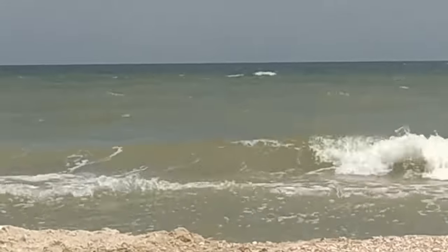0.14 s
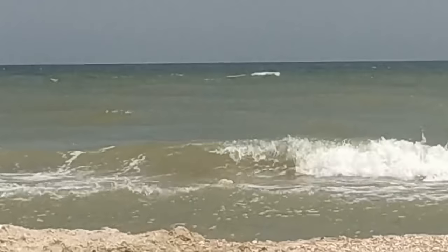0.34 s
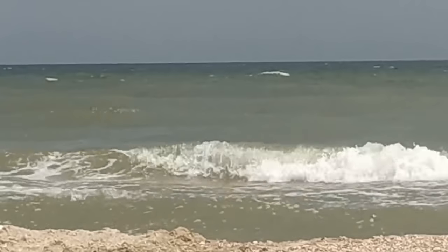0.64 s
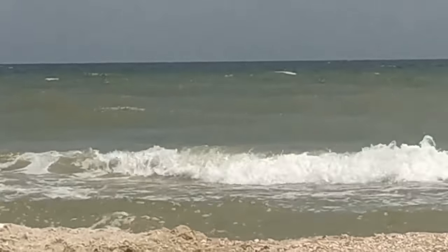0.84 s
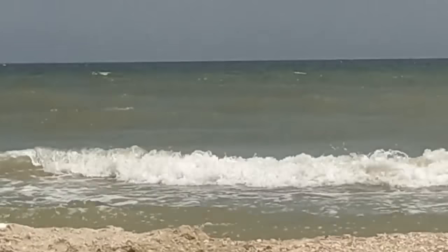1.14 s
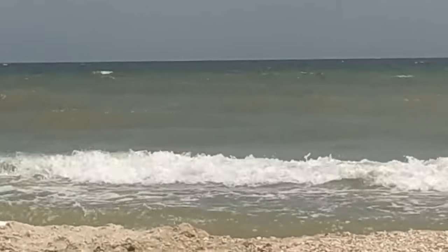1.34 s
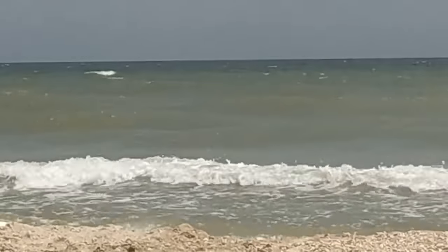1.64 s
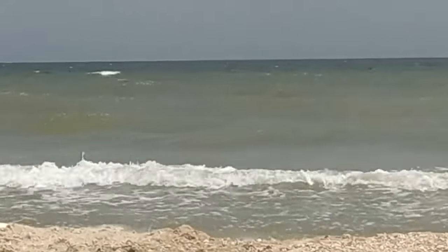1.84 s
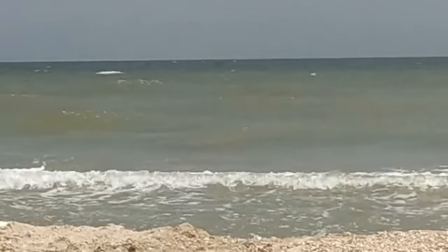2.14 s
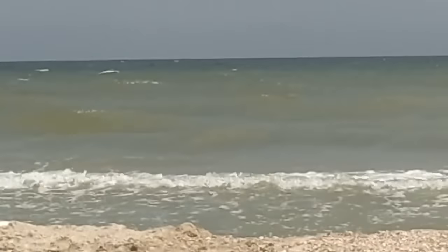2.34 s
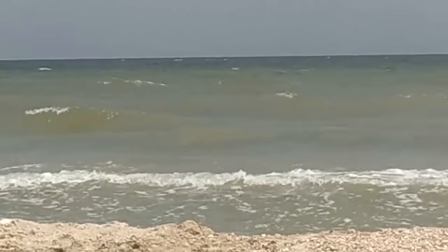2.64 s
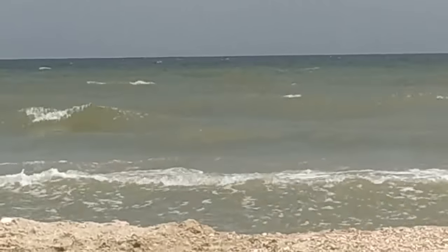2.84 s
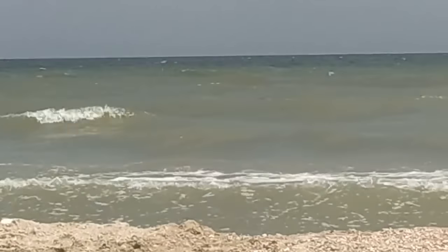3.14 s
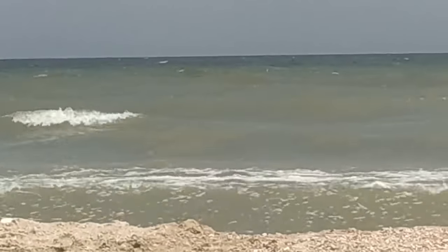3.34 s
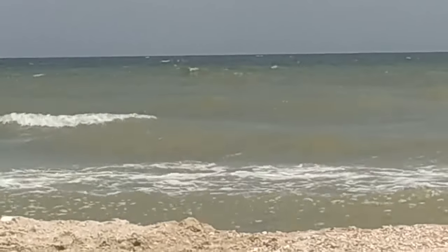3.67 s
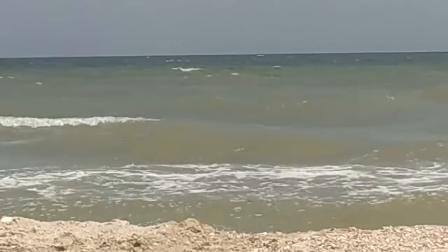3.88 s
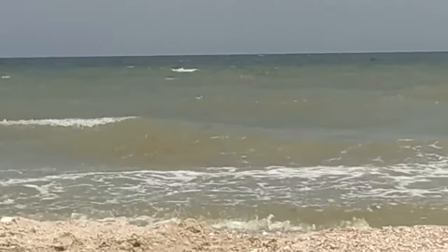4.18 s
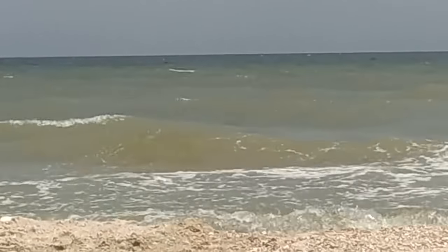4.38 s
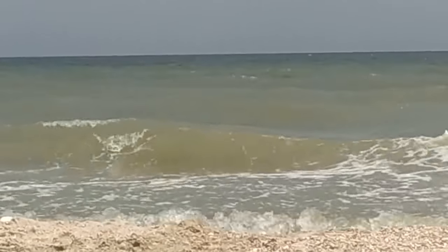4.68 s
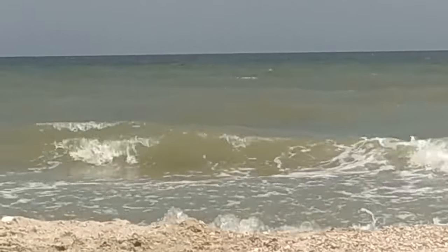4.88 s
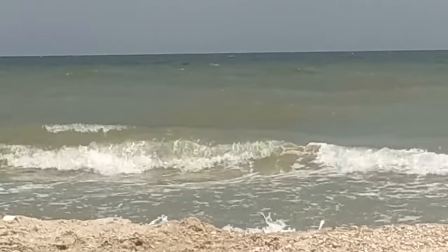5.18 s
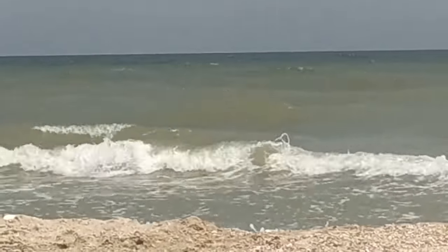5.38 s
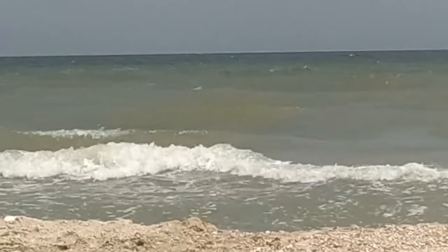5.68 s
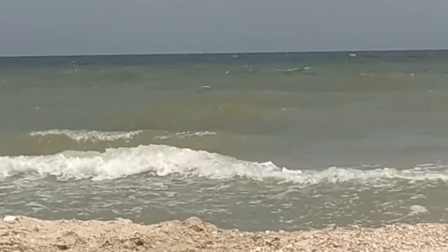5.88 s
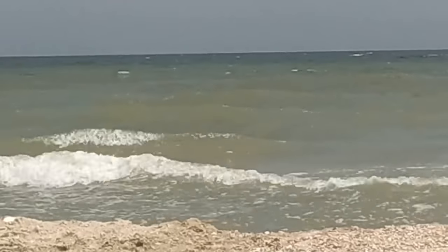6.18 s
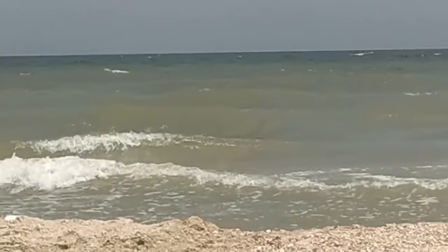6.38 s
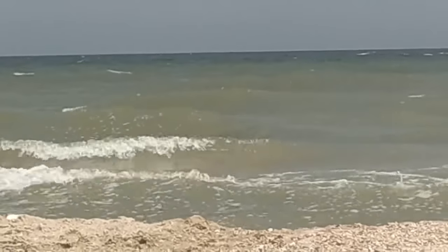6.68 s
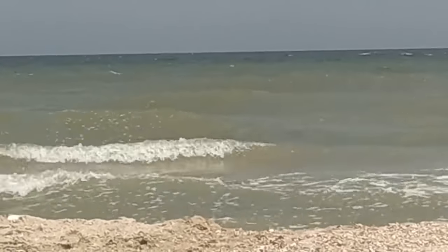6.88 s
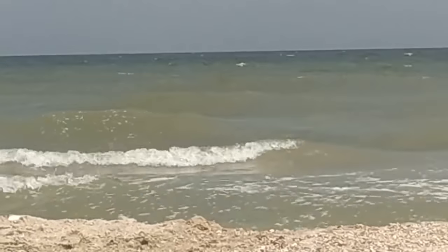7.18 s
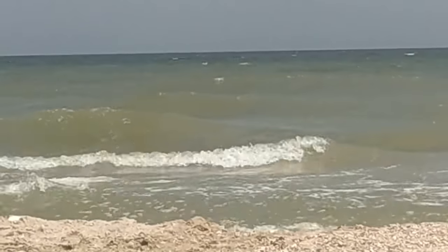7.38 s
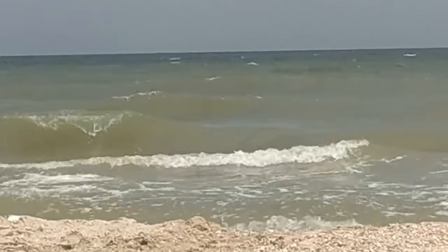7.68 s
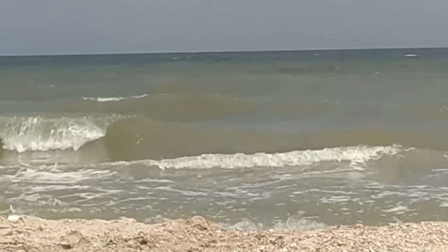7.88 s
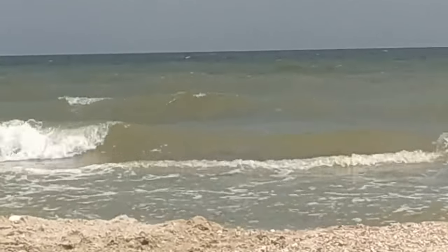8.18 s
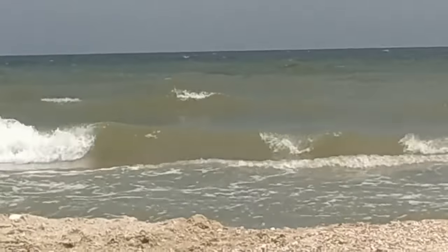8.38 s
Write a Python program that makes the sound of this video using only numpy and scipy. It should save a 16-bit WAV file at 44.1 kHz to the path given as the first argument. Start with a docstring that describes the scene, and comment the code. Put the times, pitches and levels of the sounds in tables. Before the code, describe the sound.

A steady, bright surf hiss fills the whole stretch from 0 s: a soft midrange wash, splashy grain, crisp high foam fizz and fine spray, wide in stereo with the fizz leaning left. Very low wind rumble and faint flutter move irregularly between the sides. Around 2.1 s a sharp droplet pop clicks close on the left, with fainter ticks near 2.8 and 3.6 s. The surf eases around 2.9 and 4 s, then swells fuller near 4.8-5.3 s as waves break. Wind thumps become more frequent from 5 s; the strongest gust hits at about 6.7-6.8 s, mostly left, with momentary flickering dips in the hiss, and another tiny tick at 6.9 s. Buffeting continues through 7-8 s. From 7.5 s the foam brightens, fizzing loudest in the final second and still going at the end. Outdoors, phone microphone, without echo.

```python
"""Small waves break and run up a shell beach in a fresh breeze, heard through the two ports of a phone.
From the start, shaped noise makes four layers of surf (wash, splash, fizz, spray) and the wind's rumble and flutter.
Brief tone bursts make drops of spray pop close by, first near 2.1 s; short bursts of low noise buffet one port.
Near 6.7 s the strongest gust strikes and the surf dips briefly at the left port; in the last second the foam
fizzes loudest."""
import sys
import numpy as np
from scipy import signal
from scipy.fft import rfft, irfft
from scipy.io import wavfile
from scipy.ndimage import uniform_filter1d

SR = 44100
rng = np.random.default_rng(int(sys.argv[2]) if len(sys.argv) > 2 else 0)


def persist_wave(psi):
    """Save psi, clipped to +-1, as 16-bit WAV."""
    counts = np.round(np.clip(psi, -1, 1) * 32767).astype(np.int16)
    wavfile.write(sys.argv[1], SR, np.atleast_2d(counts).T)


N = 375732


def gain_of(db):
    """Level to amplitude: 20 dB is a factor of ten."""
    return 10 ** (np.asarray(db) / 20)


def evened(x):
    """Normalization to unit rms."""
    return x / np.sqrt(np.mean(x ** 2) + 1e-20)


def read(points, hz):
    """Interpolation of a spectral curve along logarithmic frequency."""
    f, value = np.transpose(points)
    return np.interp(np.log(hz + 1), np.log(f + 1), value)


def follow(points, t):
    """Linear interpolation of a curve along time."""
    return np.interp(t, *np.transpose(points))


def filtered(x, shape):
    """Linear filtering: multiplying the spectrum by a gain curve colours both channels."""
    return irfft(rfft(x) * gain_of(read(shape, np.fft.rfftfreq(N, 1 / SR))), N)


def coloured(shape, steady_s):
    """Filtered noise, incoherent between the ports, its rms held near 1 over steady_s."""
    x = filtered(rng.standard_normal((2, N)), shape)
    width = round(steady_s * SR)
    power = uniform_filter1d(uniform_filter1d(x ** 2, size=width), size=width)
    return x / np.sqrt(abs(power) + 1e-20)


def wander(shape, frames, bins):
    """Moving averages correlate a random field over some frames and bins; its rms is 1."""
    field = uniform_filter1d(rng.standard_normal(shape), size=frames, axis=-1)
    return evened(uniform_filter1d(field, size=bins, axis=-2))


def slow_wander(t, frames):
    """A smoothed random curve for each port, with steps of 256 samples, interpolated to the samples."""
    frame_s = np.arange(N // 256 + 2) * 256 / SR
    curves = wander((2, 1, len(frame_s)), frames, bins=1)[:, 0]
    return np.array([np.interp(t, frame_s, curve) for curve in curves])


def buffets(t):
    """Amplitude modulation: Gaussian envelopes let bursts of low and higher noise through at one port."""
    # Gusts that buffet one port. Each row: centre in seconds, port (0 left, 1 right), rms level at the
    # centre in dB, length in seconds, share of the power that reaches higher (0-1).
    gust_rows = [(0.435, 1, -45, 0.038, 0.3), (0.489, 0, -45, 0.04, 0.0), (0.696, 0, -42, 0.048, 0.0),
                 (0.81, 1, -43, 0.06, 0.5), (1.246, 0, -44, 0.023, 0.0), (1.512, 1, -44.5, 0.049, 0.2),
                 (1.76, 0, -43, 0.16, 0.04), (2.215, 1, -42, 0.03, 0.19), (2.22, 0, -35, 0.03, 0.4),
                 (2.445, 0, -35, 0.053, 0), (2.928, 0, -49, 0.046, 0.0), (3.074, 1, -43, 0.029, 0.0),
                 (3.126, 0, -43, 0.055, 0.1), (3.312, 1, -61, 0.09, 0.1), (3.607, 0, -32, 0.044, 0.04),
                 (4.29, 0, -42.9, 0.05, 0), (4.67, 1, -41.4, 0.069, 0.3), (4.86, 1, -44, 0.039, 0.0),
                 (4.867, 0, -35, 0.099, 0.1), (4.99, 1, -42, 0.029, 0.27), (5.293, 0, -37, 0.072, 0.6),
                 (5.443, 0, -40, 0.03, 0.26), (5.512, 1, -49, 0.054, 0), (5.565, 0, -45, 0.1, 0),
                 (5.777, 1, -47, 0.035, 0.0), (5.81, 0, -41.5, 0.062, 0.0), (6.103, 0, -38.5, 0.068, 0.0),
                 (6.26, 0, -35, 0.019, 0.3), (6.354, 1, -36, 0.03, 0.14), (6.377, 0, -44, 0.09, 0.07),
                 (6.624, 0, -34, 0.1, 0.27), (6.687, 0, -29, 0.018, 0.7), (6.725, 0, -43, 0.028, 0.6),
                 (6.756, 0, -27.5, 0.023, 0.8), (6.786, 0, -27.5, 0.024, 0.8), (6.74, 0, -47.5, 0.21, 0.5),
                 (6.77, 1, -35, 0.057, 0.4), (6.845, 0, -33, 0.056, 0.3), (6.899, 1, -40, 0.034, 0),
                 (6.954, 0, -30.5, 0.038, 0.5), (6.997, 0, -42, 0.036, 0.4), (7.03, 0, -44, 0.17, 0.16),
                 (7.07, 0, -41, 0.04, 0.04), (7.021, 1, -37, 0.04, 0), (7.093, 1, -34, 0.068, 0),
                 (7.118, 0, -29.5, 0.036, 0.3), (7.298, 0, -33.5, 0.036, 0.6), (7.36, 1, -45, 0.053, 0.0),
                 (7.458, 0, -31, 0.037, 0), (7.57, 1, -38, 0.058, 0.1), (7.636, 0, -35, 0.059, 0.08),
                 (7.807, 1, -38, 0.055, 0.2), (7.907, 0, -35.5, 0.036, 0.0), (7.946, 1, -37, 0.07, 0.1),
                 (8.002, 0, -34, 0.03, 0.6), (8.067, 0, -32.5, 0.092, 0.54), (8.224, 0, -37, 0.044, 0.2),
                 (8.225, 1, -40, 0.038, 0.2), (8.354, 0, -38, 0.033, 0.01), (8.442, 0, -41, 0.034, 0.1)]
    # Spectra of the thud, strongest at 70 and 180 Hz, and of its higher part.
    # Each row: frequency in Hz, relative level in dB.
    low_shape = [(30, -0.5), (70, 4), (125, -5.5), (180, 4), (250, -14), (330, -9.5), (500, -20),
                 (1200, -62)]
    upper_shape = [(250, -15.5), (330, -6.5), (450, -13.5), (600, -11), (900, -17), (1500, -33.5)]
    low, upper = np.zeros((2, 2, N))
    for s, port, db, length, reach in gust_rows:
        near = slice(max(round((s - .25) * SR), 0), round((s + .25) * SR))
        gust = gain_of(db) * np.exp(-(2 * (t[near] - s) / length) ** 2)
        share = np.clip(reach, 0, 1)
        low[round(port), near] += np.sqrt(1 - share) * gust
        upper[round(port), near] += np.sqrt(share) * gust
    return low * coloured(low_shape, steady_s=.04) + upper * coloured(upper_shape, steady_s=.04)


def wind():
    """Incoherent pressure noise at the ports: slow swings, a flutter in puffs, and short buffets."""
    # Wind on the ports, before puffs and waver. Each row: time in seconds, rms level in dB of the
    # slow swings at the left, at the right, of the flutter at the left, at the right.
    breeze = [(0.0, -29, -40, -53, -60), (0.25, -37, -35, -59, -55.5), (0.5, -42, -28.5, -50, -51),
              (0.75, -27, -21, -49, -53), (1.0, -53, -27.5, -59, -53), (1.25, -24, -31, -48, -54),
              (1.5, -42, -26.5, -52, -54), (1.75, -22, -30.5, -46, -50), (2.0, -45, -28, -52, -54),
              (2.25, -22, -31.5, -45, -50), (2.5, -22, -28.5, -48, -57), (2.75, -46, -28, -52, -48),
              (3.0, -23, -45, -48, -47), (3.25, -26, -25, -63, -55), (3.5, -34, -19.5, -57, -53),
              (3.75, -32, -32, -47, -52), (4.0, -26, -30.5, -47.5, -58), (4.25, -57, -30, -59, -54),
              (4.5, -37, -36, -53, -49), (4.75, -29.5, -27.5, -54, -54), (5.0, -21, -24, -41.5, -58),
              (5.25, -17.5, -28, -61, -45), (5.5, -25.5, -22.5, -42, -47), (5.75, -26, -27.5, -48, -46.5),
              (6.0, -37, -26.5, -47, -56), (6.25, -31, -22, -51, -50), (6.5, -25, -26, -48, -49),
              (6.75, -18.5, -23, -44, -46), (7.0, -23, -24.5, -45, -46), (7.25, -17, -19, -46, -49),
              (7.5, -28, -33, -52, -55), (7.75, -34, -23.5, -41, -54), (8.0, -29.5, -23.5, -44, -50),
              (8.25, -31.5, -26, -42, -45), (8.52, -28, -32, -51, -49)]
    # Spectra of the swings and of the flutter. Each row: frequency in Hz, relative level in dB.
    swing_shape = [(1, 4), (5, -1), (10, 3.5), (20, -5.5), (32, -22.5), (45, -22.5), (62, -39), (120, -42),
                   (250, -75)]
    flutter_shape = [(30, 4.5), (70, -0.5), (125, -7.5), (180, -5.5), (250, -12.5), (500, -15), (1200, -62)]
    swing_waver_db, flutter_waver_db = 1.5, 2  # per unit of the random waver
    puffs_db, puff_most = 7, 1.4  # dB per unit of puff; puffs level off, lulls sink freely

    t = np.arange(N) / SR
    s, *columns = np.transpose(breeze)
    levels_db = np.array([np.interp(t, s, c) for c in columns])
    puffs = np.minimum(slow_wander(t, frames=10), puff_most)
    waver = slow_wander(t, frames=30)
    swing_db = levels_db[:2] + swing_waver_db * waver
    flutter_db = levels_db[2:] + puffs_db * puffs + flutter_waver_db * waver
    swings = gain_of(swing_db) * coloured(swing_shape, steady_s=.2)
    flutter = gain_of(flutter_db) * coloured(flutter_shape, steady_s=.04)
    return swings + flutter + buffets(t)


def pops(port_hz=((9800,), (8800,)), length_s=.0008):
    """Resonance: each pop rings both ports at their own frequency in a short symmetrical tone burst."""
    # Drops of spray that pop close by. Each row: time in seconds (the burst centres two length_s later),
    # peak level at the left port in dB, how much lower it is at the right in dB.
    drops = [(2.1045, -8, 8), (2.1074, 4, 8), (2.796, -7, 12), (3.5543, -5, 9), (6.8962, -6, 10)]
    out, t = np.zeros((2, N)), np.arange(-200, 200) / SR
    ring = np.exp(-(t / length_s) ** 4) * np.sin(2 * np.pi * np.array(port_hz) * t)
    for s, db, lean_db in drops:
        at = round((s + 2 * length_s) * SR) - 200
        out[:, at:at + len(t)] += gain_of([[db], [db - lean_db]]) * ring
    return out


def dips():
    """Amplitude modulation: the gain of the left port sinks for a few milliseconds."""
    # Dips in the strongest gust. Each row: centre in seconds, depth in dB, length in seconds.
    dip_rows = [(6.6985, -16, .004), (6.7619, -11, .0025), (6.7748, -12, .004)]
    t = np.arange(N) / SR
    left_db = sum(db * np.exp(-(2 * (t - s) / length) ** 4) for s, db, length in dip_rows)
    return gain_of([left_db, np.zeros(N)])


def layer_shares(hz):
    """Crossfaded bands: at every frequency the shares of the four layers add to one."""
    # Centres of wash, splash, fizz and spray in Hz.
    centres_hz = [1400, 4800, 9700, 13000]
    return np.array([read(list(zip(centres_hz, row)), hz) for row in np.eye(4)]).T


def swell(t, hz, shares):
    """Level modulation by band: each layer swells and leans; gives level and left-right difference in dB."""
    # The waves; only departures from each column's mean count. Each row: time in seconds, roar of the
    # breakers in dB, foam fizz in dB, fine spray in dB, lean to the left of foam in dB, of spray in dB.
    waves = [(0.0, -42.5, -19.5, -32.5, 10.5, 3), (0.5, -40.5, -19, -33, 14.5, 3),
             (0.95, -41, -18.5, -32.5, 9, 5), (1.3, -41, -19.5, -32.5, 12, 5),
             (1.8, -40, -20, -29.5, 10, 5), (2.15, -39.5, -18, -29.5, 8, 7),
             (2.5, -41.5, -20, -32, 12.5, 6), (2.9, -44, -22.5, -33, 12.5, 5),
             (3.3, -42.5, -19, -32.5, 10, 7), (3.7, -41.5, -18.5, -33.5, 10, 5),
             (4.0, -42, -21, -34, 11.5, 6), (4.35, -41, -17.5, -32.5, 11.5, 4),
             (4.75, -37.5, -18.5, -30.5, 12.5, 9), (5.3, -39, -16.5, -28.5, 7.5, 3),
             (5.55, -41.5, -19.5, -31, 10.5, 7), (6.0, -42.5, -19, -29, 8.5, 6),
             (6.5, -42.5, -18.5, -28.5, 9.5, 6), (6.9, -42, -18, -29.5, 9.5, 7),
             (7.1, -41, -17, -30, 12.5, 7.5), (7.5, -39.5, -16, -30, 13, 7.5),
             (7.8, -39, -15.5, -28.5, 9, 5), (8.1, -37.5, -14, -29, 10, 1.5),
             (8.52, -38.5, -12.5, -30, 10.5, 3)]
    # Shift of the mean level, then mean lean to the left, in dB for wash, splash, fizz and spray.
    layer_db = [0.06, -0.37, 0.5, -2.5]
    layer_lean_db = [1, -1.5, 0.83, -4]
    # Deep part of the wash; only departures from the mean count. Each row: time in seconds, level in dB.
    low_wash = [(0.0, -46.5), (0.73, -45), (2.16, -43.5), (2.82, -48.5), (4.03, -49), (4.7, -44.5),
                (5.13, -42), (5.91, -47.5), (6.86, -44.5), (7.21, -46), (7.9, -44), (8.52, -43)]
    # Where the deep part rules. Each row: frequency in Hz, share (0-1).
    low_wash_share = [(800, 1), (1400, 0)]
    # The band above the roar rises and sinks on its own. Each row: time in seconds, change in dB.
    low_splash = [(0.0, -1.5), (1.0, -1.5), (2.0, 0.5), (3.0, 2.5), (4.0, 0.5), (5.5, 2.5), (6.5, 0.5),
                  (7.5, -1), (8.52, 1)]
    # Extent of that band. Each row: frequency in Hz, share (0-1).
    low_splash_share = [(1900, 0), (2800, 1), (4200, 0)]
    splash_from_roar, splash_from_spray, wash_leans = 0.68, 0.69, 0.43  # dB per dB

    s, *columns = np.transpose(waves)
    roar, fizz, spray, lean, spray_lean = (np.interp(t, s, c - c.mean()) for c in columns)
    splash = splash_from_roar * roar + splash_from_spray * spray
    level_db = shares @ (np.c_[layer_db] + [roar, splash, fizz, spray])
    s, deep = np.transpose(low_wash)
    deep_change = np.interp(t, s, deep - deep.mean())
    level_db += read(low_wash_share, hz)[:, None] * (deep_change - roar)
    level_db += read(low_splash_share, hz)[:, None] * follow(low_splash, t)
    # The wash leans with the foam, the splash keeps its mean lean.
    lean_db = shares @ (np.c_[layer_lean_db] + [wash_leans * lean, 0 * lean, lean, spray_lean])
    return level_db, lean_db


def flicker(shares, frames):
    """Random level modulation: small drifting patches and quick flicker of wide bands, in dB."""
    # Depths in dB rms for wash, splash, fizz and spray: of the small patches, of the wide flicker
    # (a row for the left port, a row for the right), and of the flicker that both ports share.
    patchy_db = [1.27, 2.13, 0.35, 2.6]
    port_flicker_db = [
        [.2, .6, 0.99, 0.26],
        [.7, 1.1, 0.16, 0.71],
    ]
    common_db = [0.095, 0.16, 0.1, 0.36]
    patches = (shares @ patchy_db)[:, None] * wander((2, 257, frames), frames=10, bins=6)
    own = (port_flicker_db @ shares.T)[:, :, None] * wander((2, 257, frames), frames=8, bins=120)
    common = (shares @ common_db)[:, None] * wander((257, frames), frames=9, bins=60)
    return patches + own + common


def foam_tilt(t, hz):
    """Spectral tilt: the fizz at the left port shifts from the low to the high side of its peak."""
    # Course of the tilt. Each row: time in seconds, tilt in dB.
    tilt = [(0.0, 0), (1.5, -2), (3.0, -1.5), (4.5, 0.5), (5.6, -2.5), (6.3, -0.5), (7.0, 2), (7.7, 2.5),
            (8.52, 2.5)]
    # Its effect on the spectrum. Each row: frequency in Hz, change in dB per dB of tilt.
    tilt_shape = [(7000, 0), (8500, -1), (9800, 0), (11000, .7), (11900, 1.2), (12600, 0)]
    return read(tilt_shape, hz)[:, None] * follow(tilt, t)


def partly_coherent(hz, frames):
    """Partial coherence: the right port mixes the delayed left noise with noise of its own."""
    # Left-right likeness. Each row: frequency in Hz, coherence (0-1).
    likeness = [(200, 0), (330, 1), (450, 0.7), (800, 0.5), (1600, 0), (2200, 0)]
    right_lag_s = .00016  # the surf reaches the left port first
    a, b = rng.standard_normal((2, 257, frames)) + 1j * rng.standard_normal((2, 257, frames))
    same = np.clip(read(likeness, hz), -1, 1)[:, None]
    late = np.exp(-2j * np.pi * hz * right_lag_s)[:, None]
    return np.array([a, same * late * a + np.sqrt(1 - same ** 2) * b])


def flecked(x):
    """Random modulation: narrow bands come and go within hundredths of a second at equal mean power."""
    # Depth of the narrow-band flecks. Each row: frequency in Hz, depth in dB per unit of random field.
    fleck_depth = [(1500, 0), (2500, 13), (5000, 26), (7000, 7), (8500, 0), (12000, 0), (14000, 9)]
    fleck_most = .7  # flecks level off, the gaps between them sink freely
    hz, t, z = signal.stft(x, SR, nperseg=2048)
    field = np.minimum(wander(z.shape, frames=2, bins=2), fleck_most)
    flecks = gain_of(read(fleck_depth, hz)[:, None] * field)
    rms = np.sqrt(np.mean(flecks ** 2, axis=-1, keepdims=True))
    return signal.istft(z * flecks / rms, SR, nperseg=2048)[1][:, :N]


def surf():
    """Short-time spectral synthesis: random spectra take the level of each layer, port and moment."""
    # Surf through each port, resonance included, before the layers' level shifts.
    # Each row: frequency in Hz, spectral density in relative dB.
    left_port = [(300, -78.5), (520, -82), (800, -72), (1150, -69.5), (1550, -64.5), (2000, -67),
                 (2600, -74), (3600, -74.5), (4800, -74), (5600, -66), (7600, -65.5), (8600, -56),
                 (9800, -46.5), (11500, -54), (14200, -56.5)]
    right_port = [(300, -77), (480, -77.6), (800, -72.1), (1300, -70.4), (2200, -71.7), (3600, -74.3),
                  (4800, -73.3), (5600, -70.1), (7200, -65.9), (8000, -60.7), (8700, -56.2), (9300, -57.7),
                  (10400, -62), (12500, -63.7), (14200, -62.4)]
    # The surf fades out under the wind. Each row: frequency in Hz, gain in dB.
    bass_fade = [(60, -37), (170, -18), (255, -19), (300, -0.5)]
    frames, hz = N // 128 + 5, np.fft.rfftfreq(512, 1 / SR)
    t = np.arange(frames) * 128 / SR
    shares = layer_shares(hz)
    level_db, lean_db = swell(t, hz, shares)
    ports_db = np.array([read(port, hz) for port in (left_port, right_port)])
    field_db = ports_db[:, :, None] + level_db + np.array([lean_db / 2, -lean_db / 2])
    field_db += flicker(shares, frames)
    field_db[0] += foam_tilt(t, hz)
    z = partly_coherent(hz, frames) * gain_of(field_db)
    sea = signal.istft(z, SR, nperseg=512, noverlap=384, scaling="psd")[1][:, :N]
    return gain_of(0.38) * filtered(flecked(sea), bass_fade)


def scene():
    """Superposition: surf, wind and pops add at each port; the dips act on the surf alone."""
    return dips() * surf() + wind() + pops()


def record(dry, ceiling_db=-1, recovery_db_per_s=150):
    """Peak limiting: both channels duck just after the highest peaks, which clip; then the band limit."""
    clip_at, edge_hz = .94, 14260
    peak_db = 20 * np.log10(abs(dry).max(0) + 1e-9)
    fall = np.arange(N) * recovery_db_per_s / SR
    held_db = np.maximum.accumulate(peak_db + fall) - fall  # jumps to each peak, then falls steadily
    over_db = np.maximum(held_db - ceiling_db, 0)
    ducked = dry / gain_of(uniform_filter1d(over_db, size=61, origin=30))  # mean of the last 61 samples
    taps = signal.firwin(1023, edge_hz, window=("kaiser", 9), fs=SR)
    return signal.oaconvolve(np.clip(ducked, -clip_at, clip_at), taps[None], "same")


dry = scene()
out = record(dry)
persist_wave(out)
```